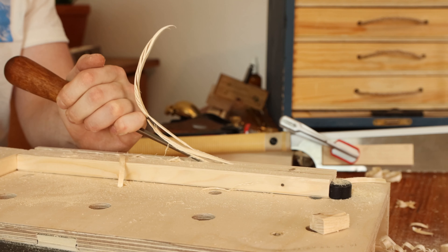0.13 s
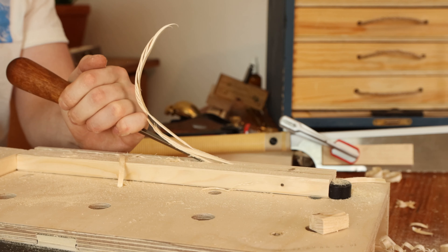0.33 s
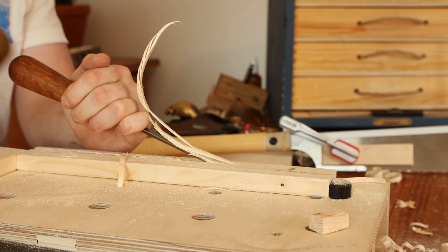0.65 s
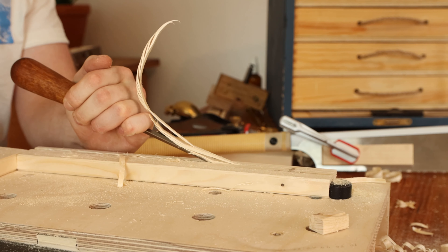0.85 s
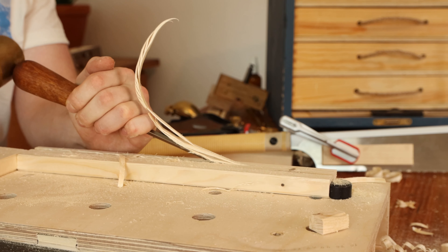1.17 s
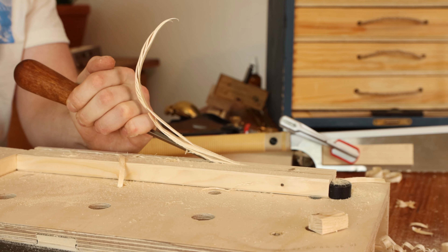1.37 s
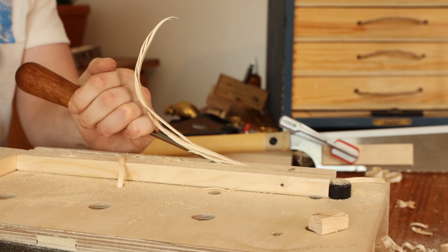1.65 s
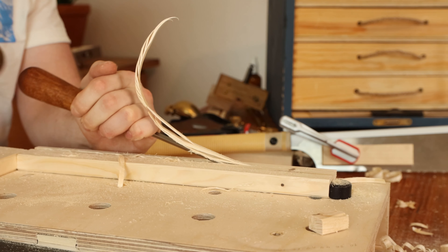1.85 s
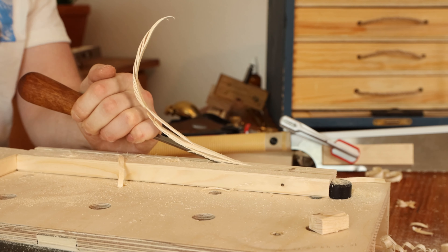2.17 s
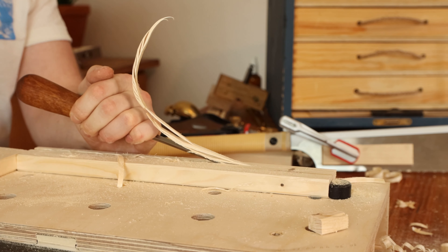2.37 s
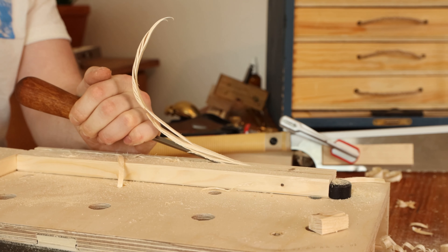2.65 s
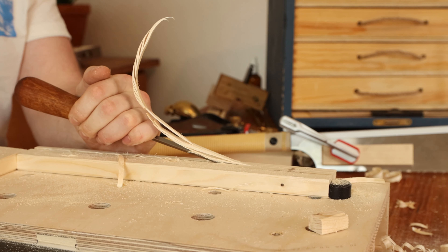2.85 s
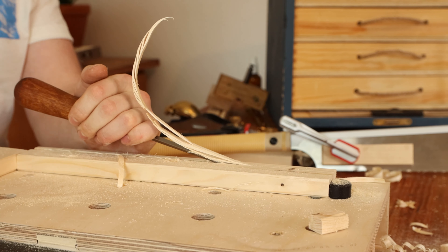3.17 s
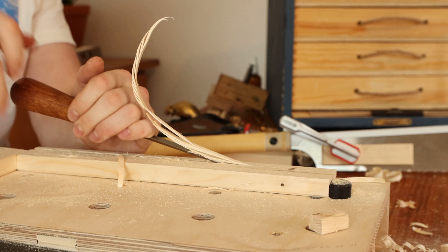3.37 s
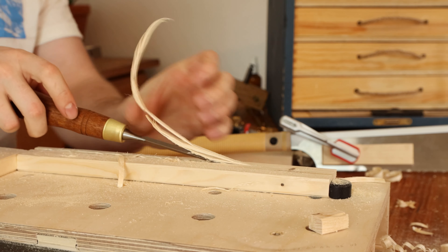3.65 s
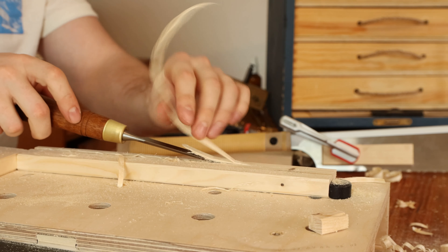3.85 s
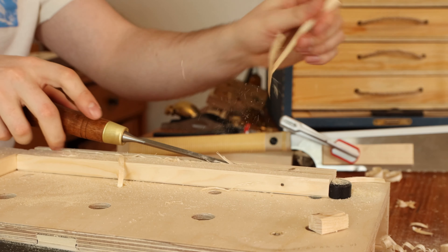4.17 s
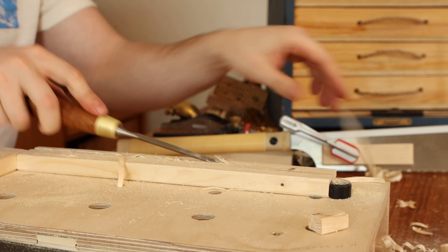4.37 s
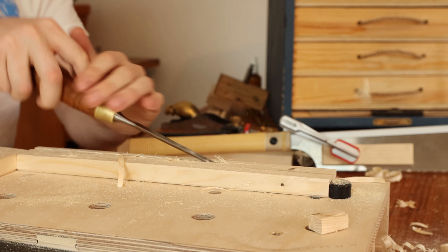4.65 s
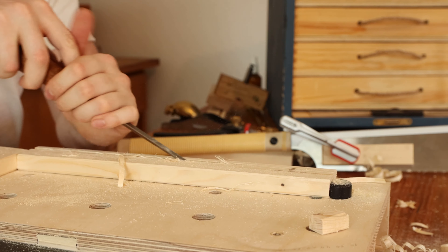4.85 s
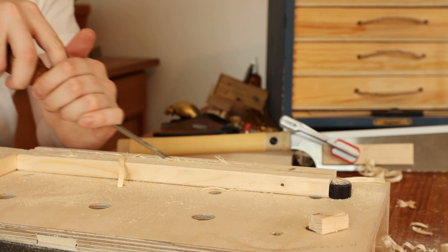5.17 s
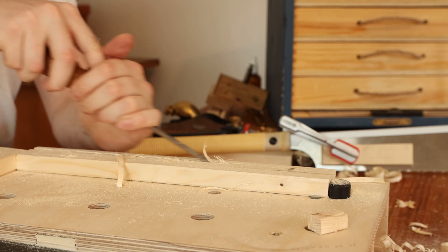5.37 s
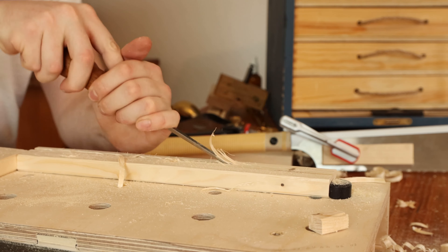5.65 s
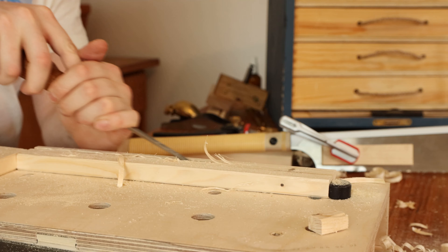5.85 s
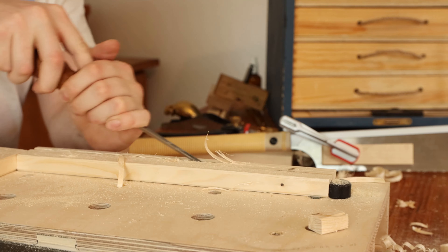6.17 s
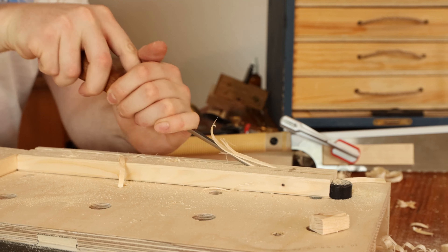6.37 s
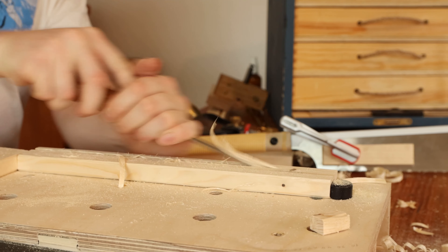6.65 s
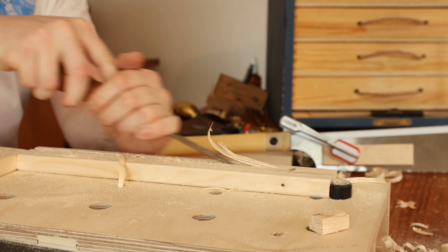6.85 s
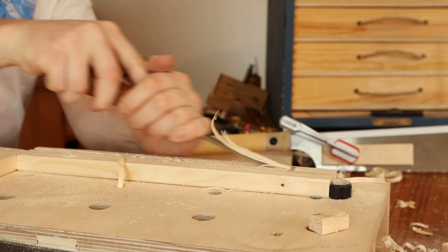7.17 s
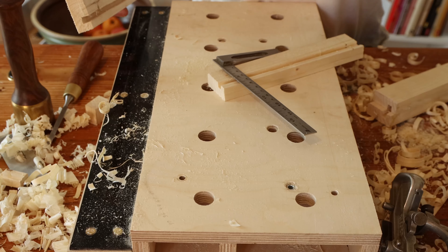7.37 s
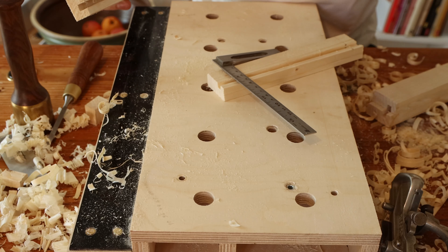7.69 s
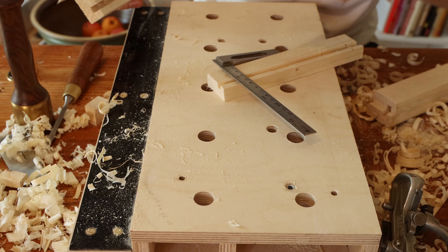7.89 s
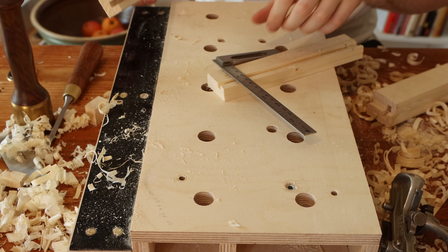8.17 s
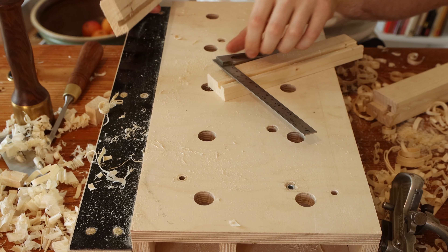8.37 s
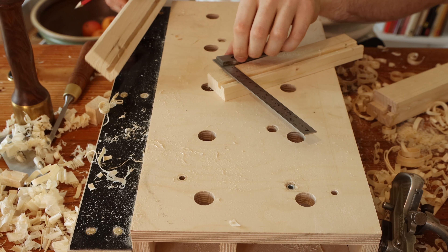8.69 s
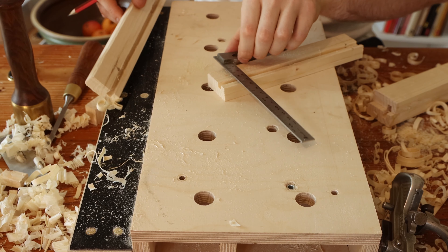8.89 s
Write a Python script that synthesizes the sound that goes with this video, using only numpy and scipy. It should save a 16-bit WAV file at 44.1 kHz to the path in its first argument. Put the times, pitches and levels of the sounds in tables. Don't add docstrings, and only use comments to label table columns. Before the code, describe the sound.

Nine brisk, very loud mallet blows on a wooden-handled chisel crack through softwood on a hollow bench, echoing in a small live room. A duller knock follows as the mallet goes down. Hands rustle, a long curl snaps away, and the chisel pares by hand in gritty stick-slip strokes with crisp snaps and softer returns. A sudden change leaves quiet room hiss, sleeve rustle and a few tiny ticks, all closely miked.

```python
import sys
import numpy as np
from scipy import signal
from scipy.fft import rfft, irfft
from scipy.io import wavfile
from scipy.ndimage import uniform_filter1d

SR = 44100
rng = np.random.default_rng(int(sys.argv[2]) if len(sys.argv) > 2 else 0)


def unload_wav(signal):
    wavfile.write(
        sys.argv[1],
        SR,
        np.round(np.clip(np.atleast_2d(signal).T, -1, 1) * 32767).astype(np.int16),
    )


def volts_from_db(level):
    exponent = np.asarray(level, float) / 20
    return 10 ** exponent


N = 398223
EDIT_S = 7.311

# start_s, level_db, tilt_db_per_octave, splitting_db, handle_ring_db
MALLET_BLOWS = [
    (0.059, -4.5, 2, -12.5, -3),
    (0.307, -4, 2, -16, -13.5),
    (0.551, -1.5, -1, -16, -19),
    (0.791, 0.5, -2, -17, -15.5),
    (1.038, -0.5, 0.5, -19, -21),
    (1.275, 1.5, 0, -20, -27),
    (1.529, 2.5, 0.5, -13.5, -25.5),
    (1.807, 3, 1.5, -15.5, -2.5),
    (2.122, -1.5, 1.5, -9, -22),
]
# pitch_hz, level_db, t60_s
BENCH_MODES = [(400, -16.5, 0.24), (426, -2.5, 0.062), (452.7, -0.5, 0.12), (528, -9, 0.015),
               (797, -9, 0.071), (820.7, -2, 0.069), (1078, -3.5, 0.043), (1090, 1, .08), (1227, 1, 0.02),
               (1304, -1.5, 0.046), (1680, -4.5, 0.0069)]
# pitch_hz, level_db, t60_s
BLADE_MODES = [(2637, 0, 0.18), (2958, -3, 0.32), (3690, 0.5, 0.076), (5225, 0.5, 0.043), (6520, -2, 0.065),
               (7870, -9.5, 0.13), (9300, -4.5, 0.071)]
# pitch_hz, level_db, t60_s
FRAME_MODES = [(115, -7, 0.11), (118.9, -1, 0.11), (155.6, -8.5, .2), (210.6, -16, 0.04), (228.1, -8, 0.15)]
# pitch_hz, level_db_per_hz
SNAP_SPECTRUM = [(350, -35.5), (600, 1), (1060, 4), (1540, -2.5), (2560, -3), (2820, -4.5), (6380, -9.5),
                 (9660, -8.5), (14000, -29), (16300, -36.5)]
# pitch_hz, level_db_per_hz
SCRAPE_SPECTRUM = [(880, -19.5), (1500, 8), (2180, -2.5), (2590, 4), (2830, 0.5), (4010, -5), (4740, 0),
                   (10000, -12), (13000, -43.5), (22000, -120)]
# pitch_hz, level_db_per_hz
HISS_SPECTRUM = [(2650, -35.5), (4500, 9), (7550, 5.5), (8460, -7), (9680, -1), (11100, -15), (14000, -11),
                 (16300, -28.5)]


def evened(x):
    return x / np.sqrt(np.mean(x ** 2) + 1e-20)


def read(points, hz):
    f, value = np.transpose(points)
    return np.interp(np.log(hz + 1), np.log(f + 1), value)


def add(mix, s, sound):
    part = mix[round(s * SR):][:len(sound)]
    part += sound[:len(part)]


def smoothed(x, size, axis=-1):
    return uniform_filter1d(x, size=size, axis=axis)


def colour(points, tilt_db=0, size=1024):
    hz = abs(np.fft.fftfreq(4 * size, 1 / SR))
    gain_db = read(points, hz) + tilt_db * np.log2(hz / 4000 + 0.3)
    log_gain = np.log(volts_from_db(np.maximum(gain_db, -100)))
    phase = -signal.hilbert(log_gain).imag
    taps = np.fft.ifft(np.exp(log_gain + 1j * phase)).real[:size]
    return taps / np.linalg.norm(taps)


def shaped(x, taps):
    return evened(signal.oaconvolve(x, taps)[:N])


def ring(modes, spread=0):
    t = np.arange(SR // 2) / SR
    out = np.zeros(len(t))
    for hz, db, t60 in modes:
        detune, louder = rng.standard_normal(2)
        decay = volts_from_db(db + 1.5 * louder - 60 * t / t60)
        out += decay * np.sin(2 * np.pi * hz * (1 + spread * detune) * t)
    return out


def burst(length_s, rise_s):
    t = np.arange(SR // 8) / SR
    envelope = (1 - np.exp(-t / rise_s)) * np.exp(-t / np.clip(length_s, .0003, .03))
    return rng.standard_normal(len(t)) * envelope


def grains(per_s, scatter_db):
    size = volts_from_db(scatter_db * np.minimum(rng.exponential(1, N), 5)) * rng.choice([-1, 1], N)
    return evened(size * (rng.random(N) < per_s / SR))


def effort(start, length, db, rise_s, swell_db, fall_db_per_s):
    t = np.arange(N) / SR - start
    swell = swell_db * (np.clip(t / length, 0, 1) - 1)
    fall = abs(fall_db_per_s) * np.maximum(t - length, 0)
    return np.clip(t / rise_s, 0, 1) * volts_from_db(db + swell - fall)


def air():
    # pitch_hz, level_db_per_hz
    air_spectrum = [(18, -8), (40, -5), (123, 0), (306, -4.5), (520, -6), (1200, -14.5), (1660, -16.5),
                    (3450, -13), (12500, -19), (16500, -25)]
    gain = volts_from_db(read(air_spectrum, np.fft.rfftfreq(N, 1 / SR)))
    return volts_from_db(-69) * evened(irfft(rfft(rng.standard_normal(N)) * gain, N))


def room(x):
    # pitch_hz, t60_s
    near_decay = [(100, 0.77), (260, 0.32), (700, 0.52), (1840, 0.39), (4850, 0.34), (12800, 0.26)]
    # pitch_hz, t60_s
    far_decay = [(100, 2.6), (400, 1.9), (1000, 1.5), (2500, 1.6), (6000, 3)]
    # pitch_hz, level_db
    wall_tone = [(60, -2), (250, 10.5), (1000, 0), (3000, -1.5), (7000, 3), (16000, -10.5)]
    taps = np.zeros(SR)
    at = np.arange(200, SR - 10, 10)
    taps[at + rng.integers(0, 10, len(at))] = rng.choice([-1., 1.], len(at))
    hz, t, z = signal.stft(taps, SR, nperseg=256)
    near = volts_from_db(-60 * t / read(near_decay, hz)[:, None])
    far = volts_from_db(-31.5 - 60 * t / read(far_decay, hz)[:, None])
    tone = volts_from_db(read(wall_tone, hz)[:, None])
    tail = signal.istft(z * tone * (near + far), SR, nperseg=256)[1]
    age = np.maximum(np.arange(len(tail)) / SR - .006, 0)
    tail = tail * (1 - np.exp(-age / 0.0025))
    return signal.fftconvolve(x, tail / np.linalg.norm(tail))[:N]


def crack(tilt_db, size=8192):
    # pitch_hz, level_db_per_hz
    crack_spectrum = [(120, -47), (200, -22.5), (354, -8), (493, -6), (662, -8.5), (1170, 0), (1890, -9.5),
                      (2640, -12.5), (3950, -17), (4930, -30.5), (5310, -24), (7260, -27.5), (9570, -31),
                      (15200, -49.5), (16300, -57.5)]
    # pitch_hz, arrival_ms, scatter_ms
    arrival = [(190, 7.854, 4.19), (530, 5.294, 4.3), (1025, 3.2, 2.5), (1790, 1.7, 2.1), (3800, 1.5, 2.4),
               (9950, 0.73, 0.78)]
    hz = np.fft.rfftfreq(size, 1 / SR)
    f, late_ms, scatter_ms = np.transpose(arrival)
    wander = np.tanh(evened(smoothed(smoothed(rng.standard_normal(len(hz)), 30), 30)))
    delay_ms = read(np.c_[f, late_ms], hz) + wander * read(np.c_[f, scatter_ms], hz)
    delay_s = np.maximum(delay_ms, .4) / 1000
    gain = volts_from_db(read(crack_spectrum, hz) + tilt_db * np.log2(hz / 2000 + 1))
    phase = -2 * np.pi * np.cumsum(delay_s) * hz[1]
    taps = irfft(gain * np.exp(1j * phase))[:size // 4]
    return taps / abs(taps).max()


def blows():
    # pitch_hz, level_db, t60_s
    handle_modes = [(2612, -1, 0.014), (2740, -1.5, .018), (9500, -15.5, .015)]
    boom_growth_db_per_s = 1.73
    out, t = np.zeros(N), np.arange(SR // 2) / SR
    for s, db, tilt_db, split_db, handle_db in MALLET_BLOWS:
        handle = (1 - np.exp(-t / .0006)) * ring(handle_modes, 0.014)
        bench = (1 - np.exp(-t / 0.0011)) * ring(BENCH_MODES, 0.004)
        steel = volts_from_db(-38) + volts_from_db(-20 - 11000 * t)
        blade = steel * ring(BLADE_MODES, 0.02)
        boom = (1 - np.exp(-t / 0.0048)) ** 2 * ring(FRAME_MODES, .02)
        split = np.convolve(burst(.007, .003), colour(HISS_SPECTRUM, -1.8))
        add(out, s, volts_from_db(db - 2.0) * crack(tilt_db))
        add(out, s, volts_from_db(db + 2 * handle_db - 1.5) * handle)
        add(out, s, volts_from_db(db - 17.5) * bench + volts_from_db(db) * blade)
        add(out, s, volts_from_db(db + boom_growth_db_per_s * s - 22.0) * boom)
        add(out, s + 0.025, volts_from_db(db + split_db - 16.0) * split)
    return out


def knock():
    # start_s, level_db
    laid_down = [
        (3.083, -4),
    ]
    # pitch_hz, level_db, t60_s
    far_end_modes = [(166, -23, .1), (246, -4.5, 0.099), (387, -3.5, 0.11), (482, -4.5, 0.18),
                     (562, 10, 0.032), (753, 6, 0.064), (930, -5, 0.033), (1136, -31, 0.0534),
                     (1306, -25.5, 0.0425), (1460, -14, .04), (1723, -20.5, 0.023), (2315, -34, .03),
                     (3160, -20.5, .03)]
    out, push = np.zeros(N), signal.windows.hann(round(0.00092 * SR))
    no_bass = signal.butter(3, 130, "high", fs=SR)
    for s, db in laid_down:
        bench = np.convolve(ring(far_end_modes), push / push.sum())
        contact = np.convolve(burst(0.032, .002), colour(SNAP_SPECTRUM, -16.5))
        rock = np.convolve(burst(0.012, 0.0011), colour(SCRAPE_SPECTRUM))
        add(out, s, volts_from_db(db - 13.5) * signal.lfilter(*no_bass, bench))
        add(out, s, volts_from_db(db - 13) * contact)
        add(out, s, volts_from_db(db - 39) * burst(.012, .002))
        add(out, s + 0.019, volts_from_db(db - 36) * rock)
    return out


def snaps():
    # start_s, level_db, bench_share_db, brightness_db_per_octave
    fibre_snaps = [(3.3154, -29.5, -20, -6), (3.441, -45.5, -15.5, -4), (3.606, -45, -4, -3.5),
                   (3.77, -46.5, -9, -3), (3.96, -24.5, -29, 4.5), (4.0796, -43, -28, 8.5),
                   (4.1106, -36.5, -17, 9), (4.153, -31.5, -31, 7.5), (4.3344, -53.5, -7, 8),
                   (4.522, -27, -17, -0.5), (4.8704, -35.5, -4, -1.5), (4.99, -36, 15, -27),
                   (5.33, -21, -25, -8), (5.693, -19, 11, -2.5), (5.7009, -23.5, -8, 9),
                   (5.9938, -43, -5, -15), (6.0513, -18.5, -29, 2.5), (6.3386, -40, 0, -19),
                   (6.4124, -23.5, 8, -2), (6.431, -35.5, -25, 7), (6.452, -47, -25, 13),
                   (6.741, -40, 14, 8), (6.7733, -23.5, 13.5, -2.5), (7.0843, -38, -9, 5),
                   (7.1318, -18.5, -25, 5.5), (7.1437, -14.5, -25, 5), (7.1457, -18.5, -6, 0)]
    finger_ticks = [
        (8.301, -42, -40, 5),
        (8.9044, -58, -40, 5),
        (8.9575, -52, -40, 5),
        (8.9744, -54, -40, 5),
    ]
    out = np.zeros(N)
    for s, db, bench_db, tilt_db in fibre_snaps + finger_ticks:
        tear = burst(0.0036 if s < EDIT_S else .0007, .0007)
        bench = ring(BENCH_MODES, 0.015)
        bench = signal.fftconvolve(smoothed(tear, 24), bench / np.linalg.norm(bench))
        add(out, s, volts_from_db(db - 2.5) * np.convolve(tear[:3000], colour(SNAP_SPECTRUM, tilt_db)))
        add(out, s, volts_from_db(db + bench_db - 6.5) * bench)
    return out


def handling():
    # start_s, length_s, rustle_db, rub_db
    moves = [(3.575, .05, -67, -67), (3.644, 0.056, -69, -79), (3.754, 0.198, -65.5, -62.5),
             (3.958, 0.0096, -39.5, -69), (3.983, 0.054, -75, -66), (4.09, 0.078, -62, -61.5),
             (4.22, 0.19, -71, -67.5), (7.35, 0.06, -84.5, -80), (7.426, .07, -80, -73),
             (7.503, 0.077, -73, -64), (8.6, 0.15, -82, -87), (8.9, 0.052, -85, -88),
             (8.949, 0.016, -62.5, -75)]
    # pitch_hz, level_db_per_hz
    rustle_spectrum = [(590, -34), (1000, 2.5), (1810, -26), (2020, -3), (9880, -13.5), (13100, -18.5),
                       (16300, -30.5)]
    # pitch_hz, level_db_per_hz
    rub_spectrum = [(35, -80), (60, -36), (275, -3), (350, 6.5), (924, -8), (1000, -11.5), (1500, -10.5),
                    (1950, -34), (3300, -120)]
    rise_s, rustle_fall_db_per_s, rub_fall_db_per_s = 0.0027, 600, 154
    rustle = shaped(grains(2800, 3.8), colour(rustle_spectrum))
    rub = shaped(rng.standard_normal(N), colour(rub_spectrum, size=4096))
    out = np.zeros(N)
    for s, length, rustle_db, rub_db in moves:
        out += rustle * effort(s, length, rustle_db, rise_s, 0, rustle_fall_db_per_s)
        out += rub * effort(s, length, rub_db, rise_s, 0, rub_fall_db_per_s)
    return out


def patchy(x, depth_db):
    z = signal.stft(x, nperseg=256)[2]
    patches = smoothed(smoothed(rng.standard_normal(z.shape), 3, axis=0), 12, axis=1)
    return evened(signal.istft(z * volts_from_db(depth_db * evened(patches)), nperseg=256)[1][:N])


def slipping():
    patch_depth = {"hum": 2.8, "rattle": 3.5, "scrape": 2.8, "hiss": 2.8}
    slips = grains(3500, 2.4)
    bench_body = colour([(220, -40), (350, 36.0), (600, 10), (1000, -35.5)])
    work_body = colour([(400, -22.5), (700, 13.5), (1200, 2.0), (2500, -19.5)])
    parts = {
        "hum": shaped(slips, ring(BENCH_MODES[:4])) + 0.1 * shaped(slips, bench_body),
        "rattle": shaped(slips, ring(BENCH_MODES[4:])) + .9 * shaped(slips, work_body),
        "scrape": shaped(slips, colour(SCRAPE_SPECTRUM)) + 0.22 * shaped(slips, ring(BLADE_MODES[:3])),
        "hiss": shaped(slips, colour(HISS_SPECTRUM)) + .2 * shaped(slips, ring(BLADE_MODES[3:])),
    }
    parts = {name: patchy(x, patch_depth[name]) for name, x in parts.items()}
    damped_frame = ring(FRAME_MODES[:3]) * volts_from_db(-300 * np.arange(SR // 2) / SR)
    parts["thud"] = shaped(grains(300, 2.8), damped_frame)
    return parts


def paring():
    # start_s, length_s, edge_db, bench_weight_db, workpiece_rattle_db
    pushes = [
        (4.455, 0.088, -45, -11, 2),
        (4.925, .072, -48, 8.5, 0),
        (5.285, .1, -34.5, 2.5, 1),
        (5.606, .045, -39.5, 7, 3),
        (5.683, 0.015, -37.5, -3, 0.5),
        (5.955, .1, -40, 5.5, 1),
        (6.325, .1, -42.5, 7.5, 7.5),
        (6.71, .068, -39, -2, 3.5),
        (7.07, 0.059, -38, -1, 6.5),
    ]
    returns = [(4.662, .1, -53.5, 0.5, 1), (4.787, 0.093, -48.5, -10, -3), (5.11, .07, -61.5, -14, -7),
               (5.19, .07, -58, 6.5, -3), (5.51, 0.057, -51, 1, -9), (5.8, 0.11, -51.5, -6.5, -2.5),
               (6.15, 0.073, -51.5, -2, 1.5), (6.235, 0.072, -53, 13, 2.5), (6.545, .14, -51, -5.5, 0),
               (6.9, 0.13, -50, -6, 0), (7.22, .1, -54, -12, -1.5)]
    push_law = {"hum": (.1, 5.3, 195), "rattle": (.1, 11, 170), "scrape": (1.4, 6.9, 225),
                "hiss": (-1.5, 15, 240), "thud": (-13, 7.3, 58)}
    return_law = {"hum": (.1, 4.5, 250), "rattle": (.1, 1.5, 340), "scrape": (-0.35, 0.5, 290),
                  "hiss": (-1.5, 0.5, 240), "thud": (-21, 1.5, 210)}
    # start_s, length_s, level_db
    shoves = [
        (6.253, 0.038, -42),
        (6.402, 0.05, -46),
        (6.77, 0.076, -46),
    ]
    push_bite_s, return_bite_s = .024, .022
    lean_db_per_s = 5.5
    parts = slipping()
    stroke = np.zeros(N)
    for rows, law, bite_s in (pushes, push_law, push_bite_s), (returns, return_law, return_bite_s):
        for start, length, db, weight_db, rattle_db in rows:
            thud_db = 0.2 * weight_db + lean_db_per_s * (start - 6)
            extra_db = {"hum": weight_db, "rattle": rattle_db, "scrape": 0, "hiss": 0, "thud": thud_db}
            for name, (level_db, swell_db, fall) in law.items():
                part_db = db + level_db + extra_db[name]
                stroke += parts[name] * effort(start, length, part_db, bite_s, swell_db, fall)
    for start, length, db in shoves:
        stroke += parts["thud"] * effort(start, length, db, push_bite_s, 0, 150)
    return signal.sosfilt(signal.butter(4, 75, "high", fs=SR, output="sos"), stroke)


def scene():
    t = np.arange(N) / SR
    before = t < EDIT_S
    hits, small = blows() + knock(), snaps()
    rubbing = paring() * before + handling()
    wet = room(volts_from_db(-8.0) * hits + volts_from_db(-6) * small + volts_from_db(-14.0) * rubbing)
    first = round(MALLET_BLOWS[0][0] * SR)
    beat = round(.246 * SR)
    wet[:first] += volts_from_db(-3.0) * wet[beat:][:first]
    fade = np.where(before, 1, np.clip((t - EDIT_S) / .028, 0, 1))
    wet_on = np.where(before, 1, t > EDIT_S + .9)
    near = hits + small + volts_from_db(-2.5) * rubbing + air()
    return (fade * near + wet * wet_on)[None]


def roll_off(x):
    return signal.sosfilt(signal.butter(12, 16480, fs=SR, output="sos"), x)


def record(dry):
    no_bass = signal.butter(2, 60, "high", fs=SR, output="sos")
    thin = signal.sosfilt(no_bass, np.clip(dry, -1.1, 1.1))
    return roll_off(np.clip(thin, -1, 1))


dry = scene()
out = record(dry)
unload_wav(out)
```